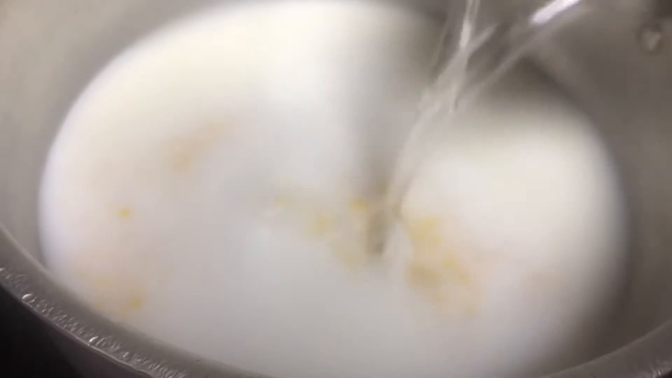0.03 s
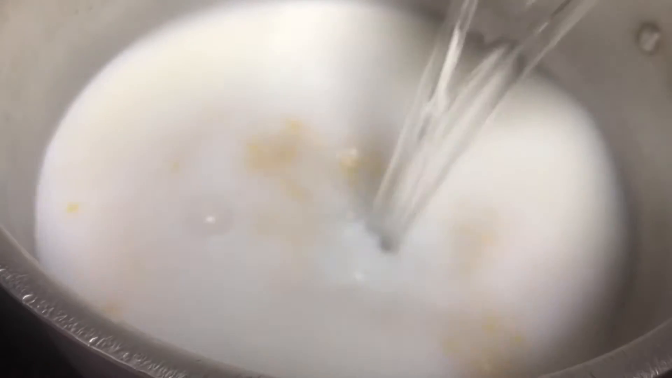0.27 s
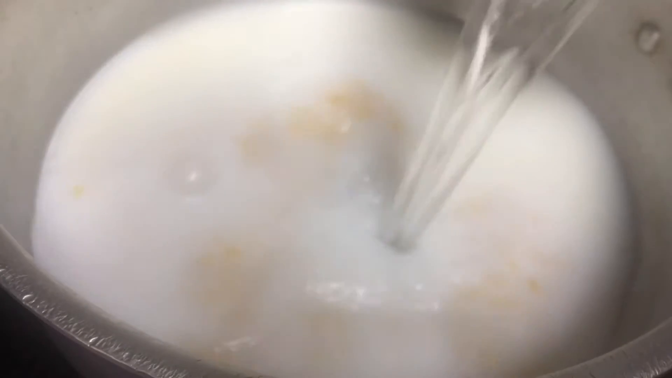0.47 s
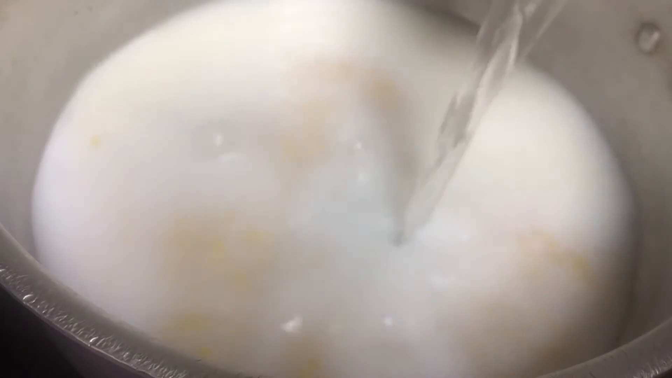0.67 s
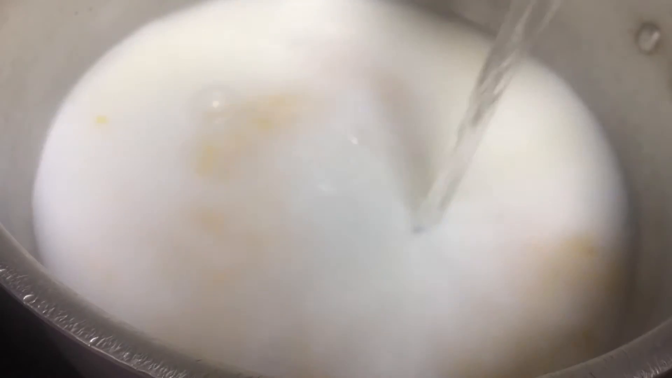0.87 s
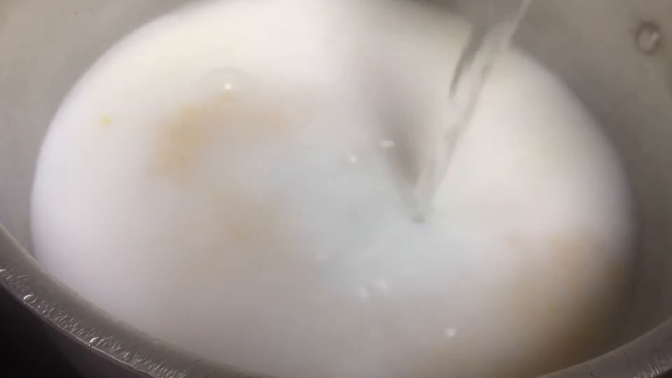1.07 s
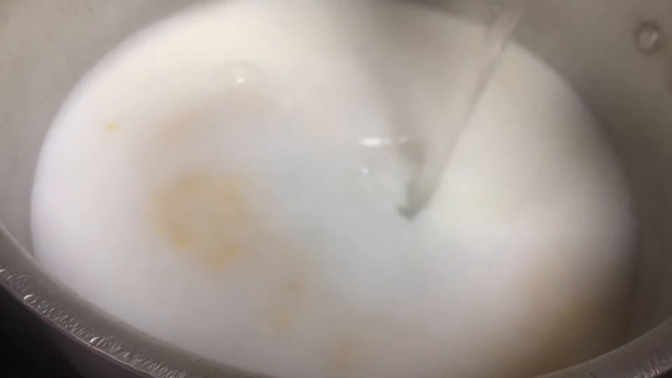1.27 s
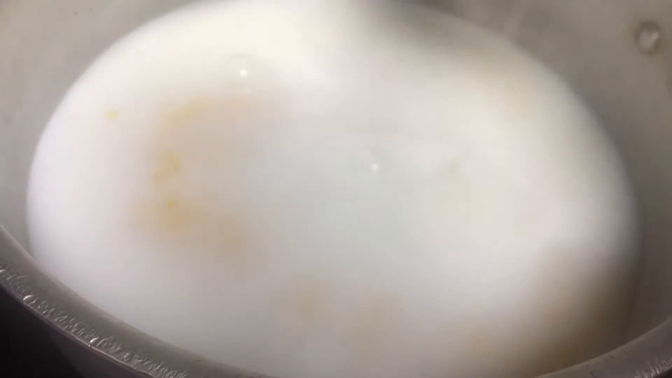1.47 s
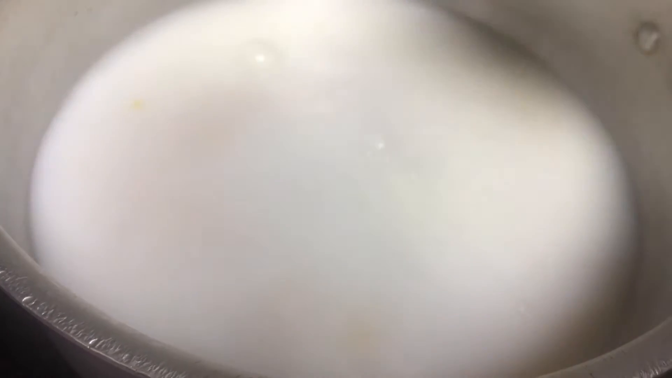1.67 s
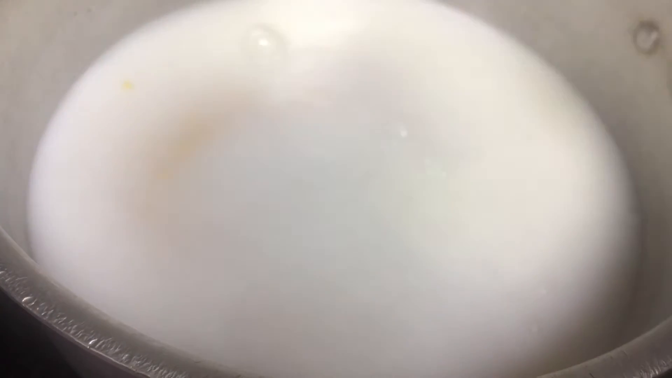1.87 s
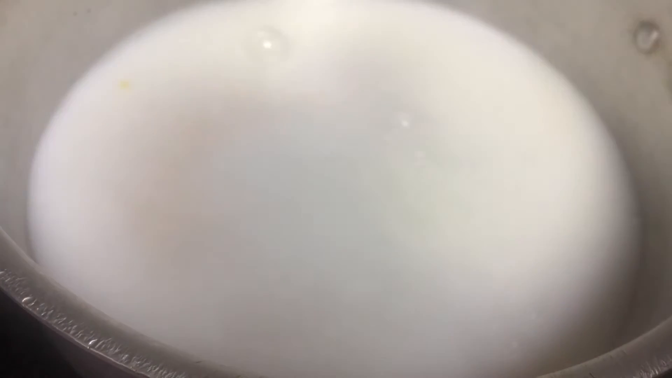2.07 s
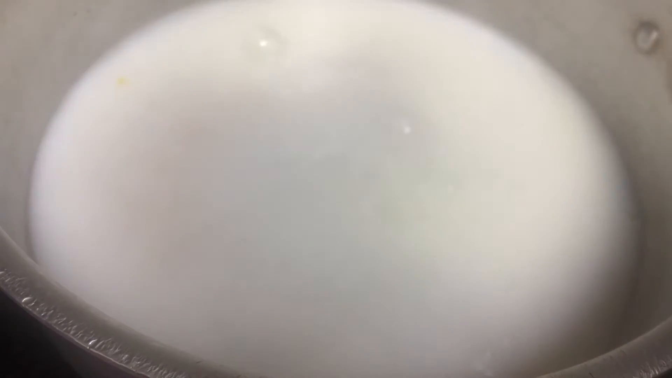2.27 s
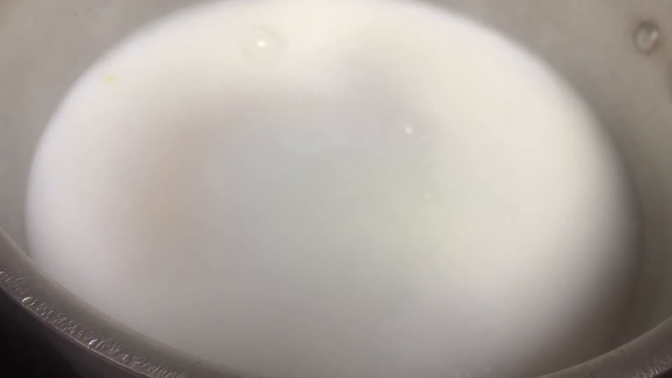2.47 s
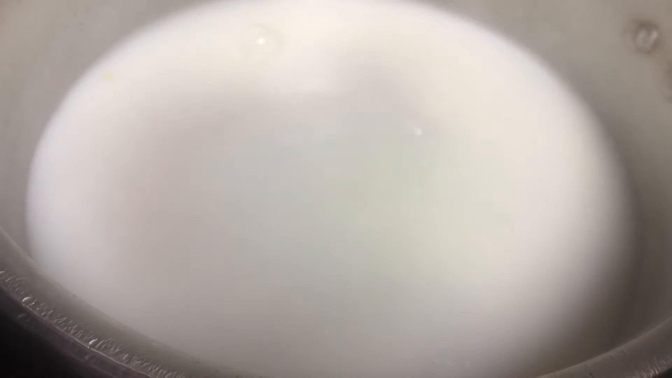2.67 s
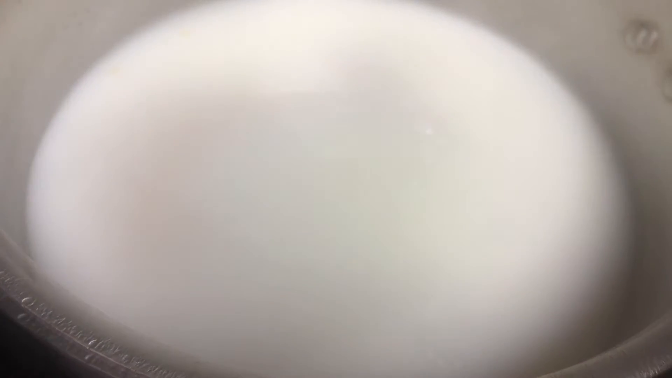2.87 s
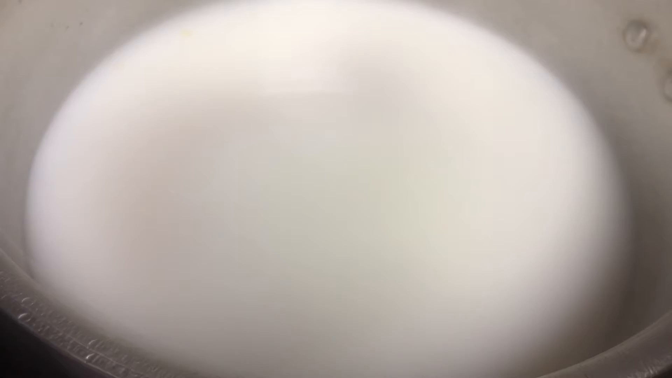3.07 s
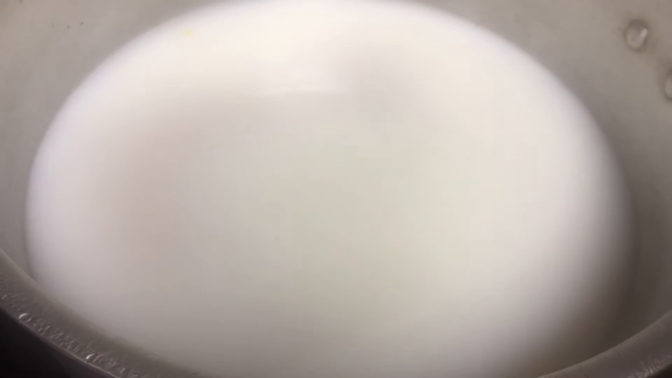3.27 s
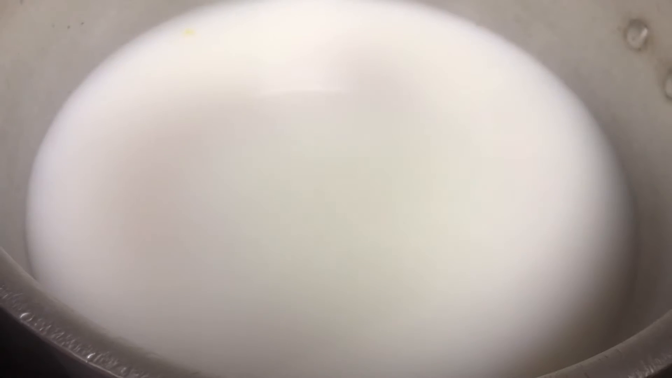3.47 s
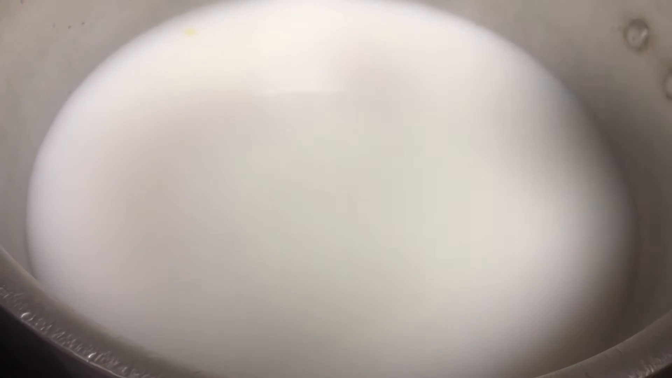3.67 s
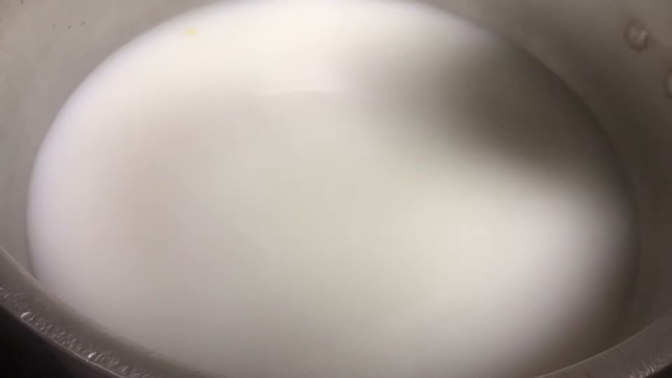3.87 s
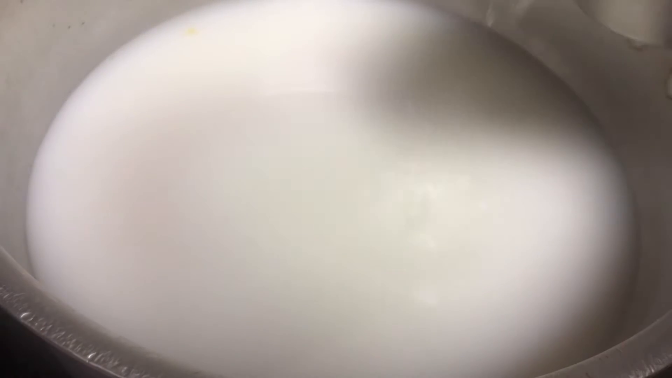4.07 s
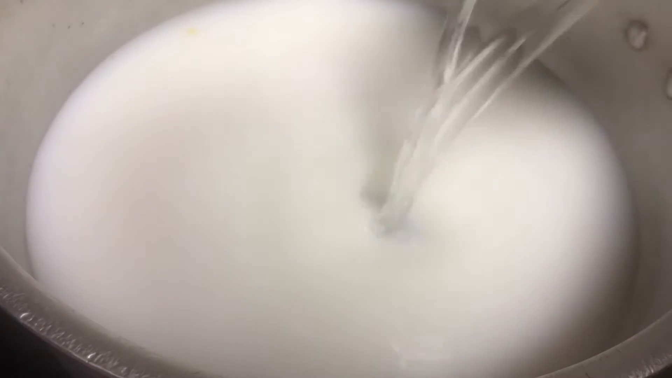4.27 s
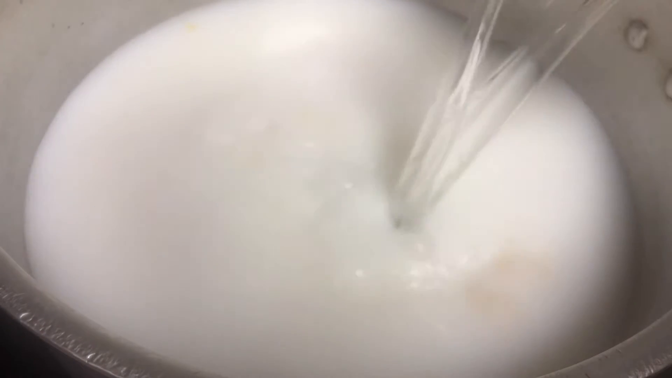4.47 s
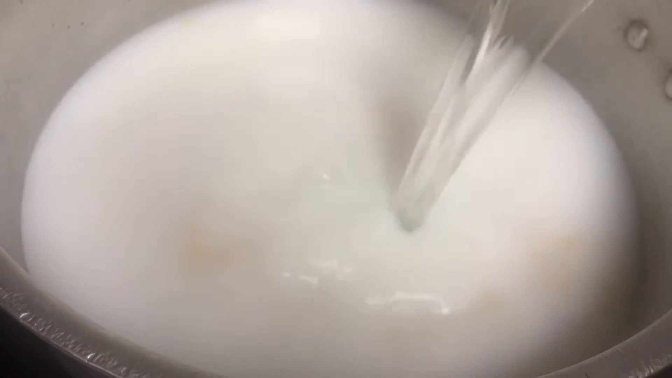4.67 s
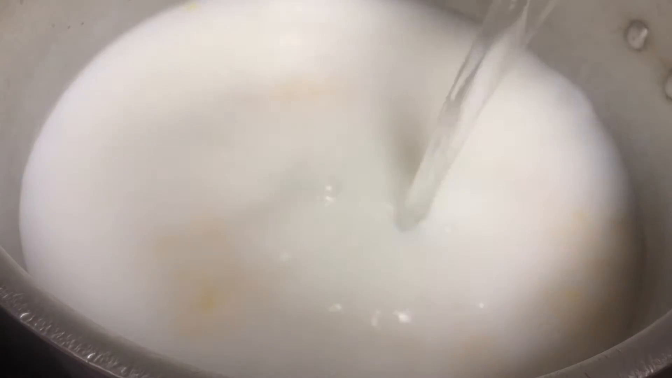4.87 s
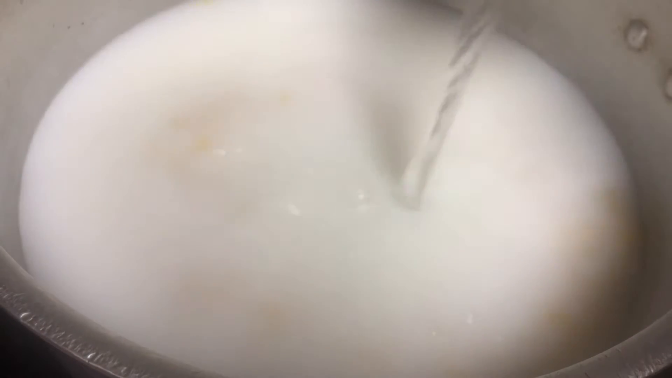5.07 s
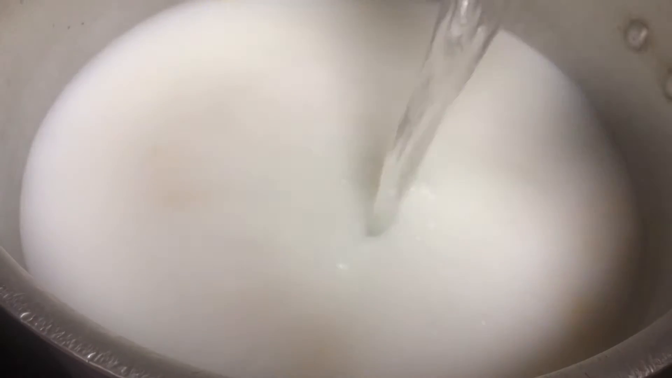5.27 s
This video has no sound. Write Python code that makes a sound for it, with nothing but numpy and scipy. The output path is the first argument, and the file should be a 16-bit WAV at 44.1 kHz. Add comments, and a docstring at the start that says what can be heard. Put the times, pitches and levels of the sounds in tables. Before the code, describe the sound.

A close microphone hears water hitting milky liquid in a steel pot for about a second and a half, bubbling and plinking. Then quiet: hollow metallic cup rubs, a short ringing scrape on the counter, fading fine fizz and a swelling motor hum. After a brief dull bump, a second pour bursts in louder, slaps and glugs, and continues to the end. The room tail is short.

```python
"""Two pours in a kitchen

Water falls from a cup into a steel pot of milky liquid, twice, while the kitchen hums.
The stream is many ringing bubbles plus noise; loud bubbles are gliding tones, slaps are puffs of noise.
The pot adds its resonances to the water. Froth ticks and hisses, and the steel cup is rubbed
and slid along the counter: dense clicks set it ringing. One brief rustle comes with a low thud."""
import sys
import numpy as np
from scipy import signal
from scipy.io import wavfile

SR = 44100
rng = np.random.default_rng(int(sys.argv[2]) if len(sys.argv) > 2 else 0)


def bounce(signal):
    """Save signal as a 16-bit WAV file at the path given by the first command-line argument."""
    frames = np.transpose(np.atleast_2d(signal))
    limited = np.clip(frames, -1, 1)
    pcm = np.round(limited * 32767).astype(np.int16)
    wavfile.write(sys.argv[1], SR, pcm)


N = 234476   # length in samples


def amp(db):
    """Turn decibels into a gain."""
    return 10 ** (np.asarray(db) / 20)


def unit(x):
    """Scale a sound to an average (rms) level of 1."""
    return x / np.sqrt(np.mean(x ** 2) + 1e-20)


def in_time(rows):
    """Draw a curve through the rows, sample by sample; outside its span it is at -150 dB."""
    s, *columns = np.transpose(rows)
    t = np.arange(N) / SR
    return [np.interp(t, s, column, left=-150, right=-150) for column in columns]


def strokes(rows, attack_s, release_s):
    """Gain of events that fade in, hold and die away (release = time to fall by a factor e)."""
    t = np.arange(N) / SR
    gain = 0
    for start_s, length_s, level_db in rows:
        fade_in = np.clip((t - start_s) / attack_s, 0, 1)
        fade_out = np.exp(-np.maximum(t - start_s - length_s, 0) / release_s)
        gain = gain + amp(level_db) * fade_in * fade_out
    return gain


def drift(rate):
    """Slow random wandering with a spread of 1; a higher rate (Hz) wanders faster."""
    r = np.exp(-80 * np.pi * rate / SR)   # smoothing for one step of 40 samples
    slow = signal.lfilter([1], [1, -2 * r, r * r], rng.standard_normal(N // 40 + 2002))[2000:]
    return np.interp(np.arange(N) / 40, np.arange(len(slow)), unit(slow))


def band(x, low_hz, high_hz):
    """Keep only the sound between two pitches."""
    return signal.sosfilt(signal.butter(2, [low_hz, high_hz], "band", fs=SR, output="sos"), x)


def resonate(x, hz, width_hz):
    """One resonance with gain 1 at its peak; a narrower one rings longer."""
    r = np.exp(-np.pi * max(width_hz, 1) / SR)
    feed = np.array([1, 0, -1]) * (1 - r * r) / 2
    return signal.lfilter(feed, [1, -2 * r * np.cos(2 * np.pi * hz / SR), r * r], x + 1e-18)


def resonate_twice(x, hz, width_hz):
    """The same resonance twice in a row: the ring swells before it dies."""
    return resonate(resonate(x, hz, width_hz), hz, width_hz)


def body(x, modes):
    """All resonances of an object side by side, with alternating signs."""
    return sum(amp(db) * (-1) ** k * resonate(x, hz, width) for k, (hz, width, db) in enumerate(modes))


def grains(per_s, spread_db):
    """Random clicks of uneven size and either sign."""
    sizes = amp(spread_db * np.minimum(rng.exponential(1, N), 5)) * rng.choice([-1, 1], N)
    return sizes * (rng.random(N) < per_s / SR)


def swarm(per_s, low_hz, high_hz, width, tilt_db, spread_db, clump_db):
    """Bubbles born in clumps, each ringing at one of 28 pitches (width as a share of it); rms 1."""
    born = grains(per_s * amp(clump_db * drift(25)), spread_db)
    dealt = rng.integers(0, 28, N)   # which pitch each bubble gets
    total = 0
    for k, hz in enumerate(np.geomspace(low_hz, high_hz, 28)):
        ring = resonate_twice(born * (dealt == k), hz, width * hz)
        total = total + amp(tilt_db * np.log2(hz / low_hz)) * ring   # tilt is dB per octave
    return unit(total)


# how the steady kitchen noise is spread over pitch: pitch_hz, relative level_db (per Hz)
AIR_COLOUR = [(15, -27), (25, -8), (111, -2.5), (149, -22), (206, -1.5), (317, -9), (384, -18.5),
              (476, -13.5), (659, -20), (962, -15), (1130, -21), (1330, -20.5), (2760, -32.5), (14800, -51),
              (16000, -59)]
# how loud that noise is over time: time_s, level_db
AIR_LEVEL = [(0, -56), (1.25, -55), (2.75, -57.5), (3.35, -54), (4.25, -53), (5.32, -54)]
# narrow appliance hums: pitch_hz, width_hz (of each of two passes), level_db
APPLIANCE_HUMS = [(56.9, 3, -69), (101, 1.9, -87), (212.6, 16, -64), (238.8, 7.5, -64.5), (7870, 130, -90),
                  (15200, 60, -93)]
# a motor hum that swells: time_s, level_db
MOTOR_LEVEL = [(0.0, -61.5), (0.92, -74), (2.44, -67), (3.03, -59), (3.82, -68), (4.25, -55.5),
               (5.32, -59.5)]
MOTOR_HZ = 121.3   # its pitch wanders around this


def background():
    """Kitchen air is noise in slightly flickering third-octave bands; appliances add narrow hums."""
    edges = 22 * 2 ** np.arange(0, 9.7, 1 / 3)
    white = rng.standard_normal((2, N))   # neighbouring bands take turns
    hz, db = np.transpose(AIR_COLOUR)
    air = 0
    for k, (low, high) in enumerate(zip(edges, edges[1:])):
        colour_db = np.interp(np.log(low * high) / 2, np.log(hz), db)
        air = air + amp(colour_db + 0.23 * drift(1.6)) * band(white[k % 2], low, high)
    hums = sum(amp(db) * unit(resonate_twice(white[0], hz, width)) for hz, width, db in APPLIANCE_HUMS)
    motor_phase = 2 * np.pi * np.cumsum(MOTOR_HZ + 0.99 * drift(5.1)) / SR
    motor = amp(in_time(MOTOR_LEVEL)[0]) * np.sqrt(2) * np.sin(motor_phase)
    return amp(in_time(AIR_LEVEL)[0]) * unit(air) + hums + motor


ROOM_T60_S = 0.13   # time for the tail to fall by 60 dB


def kitchen(x):
    """The room answers with a short dense tail that starts after 3 ms."""
    t = np.arange(int(.4 * SR)) / SR
    tail = rng.standard_normal(len(t)) * amp(-60 * t / ROOM_T60_S) * (t > .003)
    tail = signal.lfilter([.5], [1, -.5], tail)   # softer treble
    return signal.fftconvolve(x, tail / np.sqrt(np.sum(tail ** 2)))[:N]


# one brief rustle: start_s, length_s, level_db (of its bright part)
RUSTLE_EVENT = (3.775, 0.016, -54.5)
THUD_OVER_DB = 7.5   # thud above the bright part
RUSTLE_RELEASE_S, THUD_RELEASE_S = 0.04, 0.047


def rustle():
    """The same dense clicks make a bright rustle and, in a low band, a thud."""
    noise = grains(1500, 2.4)
    bright = strokes([RUSTLE_EVENT], 0.012, RUSTLE_RELEASE_S) * unit(band(noise, 1500, 6500))
    thud = strokes([RUSTLE_EVENT], 0.022, THUD_RELEASE_S) * unit(band(noise, 223, 410))
    return bright + amp(THUD_OVER_DB) * thud


# fingers rub the empty cup: start_s, length_s, level_db
RUBS = [(1.47, 0.014, -55.5), (1.58, 0.1, -58), (1.68, 0.05, -51.5), (1.81, .03, -58.5), (1.87, 0.039, -56),
        (1.97, .03, -63), (2.08, 0.053, -61)]
# resonances of the cup in the hand: pitch_hz, width_hz, relative level_db
HELD_MODES = [(1023, 74, 6), (1053, 109, 1.5), (2727, 52, -14.5), (4070, 27, -19), (4380, 46, -29),
              (5840, 30, -16)]
# a nudge, then the slide along the counter: start_s, length_s, level_db
SLIDES = [(2.43, .03, -63.5), (2.48, 0.079, -54)]
# resonances of the cup on the counter: pitch_hz, width_hz, relative level_db
SLIDE_MODES = [(950, 57, 1.5), (1270, 230, 2.5), (1994, 54, -2.5), (2810, 100, 4.5), (2950, 35, 4),
               (3980, 35, 2), (5220, 40, -3), (5900, 88, -16), (6840, 8.6, -5), (7000, 55, -33)]
RUB_ATTACK_S, RUB_RELEASE_S = 0.011, 0.018
SLIDE_ATTACK_S, SLIDE_RELEASE_S = 0.015, 0.095


def cup():
    """Dense friction clicks set the steel cup ringing, in the hand and on the counter."""
    held = unit(body(grains(2300 * amp(2 * drift(35)), 2.8), HELD_MODES))
    scrape = grains(2500, 2.1)
    slide = unit(body(scrape, SLIDE_MODES)) + amp(-6.5) * unit(band(scrape, 640, 3800))
    rubbing = strokes(RUBS, RUB_ATTACK_S, RUB_RELEASE_S) * held
    return rubbing + strokes(SLIDES, SLIDE_ATTACK_S, SLIDE_RELEASE_S) * slide


# patches of froth collapse: start_s, length_s, level_db (of the hiss)
COLLAPSES = [(1.57, .16, -81), (2.06, 0.044, -75), (3.065, 0.036, -70.5)]
# the froth left by the first pour thins out
FROTH_START_S, FROTH_DB, FROTH_FADE_DB_PER_S = 1.416, -64.5, 7


def froth():
    """Tiny bubbles on the surface burst as faint bright ticks over a patchy fine hiss."""
    ticks = swarm(900, 4800, 15000, width=0.18, tilt_db=1.5, spread_db=3.8, clump_db=5)
    edges = np.geomspace(4000, 17000, 9)
    white = rng.standard_normal((2, N))
    shared_db = 1.2 * drift(20)   # all bands swell together, and each on its own
    hiss = 0
    for k, (low, high) in enumerate(zip(edges, edges[1:])):
        hiss = hiss + amp(2 * drift(22) + shared_db) * band(white[k % 2], low, high)
    age = np.arange(N) / SR - FROTH_START_S
    thinning = amp(FROTH_DB - FROTH_FADE_DB_PER_S * age) * (age > 0)
    level = thinning + strokes(COLLAPSES, 0.02, 0.012)
    return level * (unit(hiss) + amp(-7) * ticks)


# the loudest drops slapping the surface and froth pops: start_s, relative level_db, treble pitch_hz
SLAP_EVENTS = [(0.033, -30, 5630), (0.078, -25.5, 5050), (0.1807, -35.5, 5900), (0.3082, -35, 5900),
               (0.37, -35.5, 8160), (0.403, -33.5, 6950), (0.4444, -34.5, 6500), (0.478, -41, 14200),
               (0.5402, -42, 9850), (0.603, -33, 6000), (0.6433, -30.5, 7540), (0.837, -38, 6080),
               (0.9128, -27.5, 6700), (1.078, -33.5, 5900), (1.1635, -36, 9300), (1.1915, -27.5, 9200),
               (1.202, -20.5, 6460), (1.2135, -35, 11400), (1.2424, -33, 9300), (1.276, -29, 6700),
               (1.3463, -28, 6300), (1.36, -24, 7700), (1.3817, -23, 6900), (1.3822, -28, 11600),
               (1.395, -36, 11000), (1.41, -40, 11500), (1.455, -44, 5600), (1.706, -48, 8700),
               (1.799, -50, 6800), (1.948, -54, 5700), (2.1, -51, 5900), (2.3012, -51, 6380),
               (2.7317, -51, 7260), (3.3433, -57, 9390), (3.93, -52, 13000), (4.0058, -55, 9000),
               (4.0443, -52, 11500), (4.096, -16, 5100), (4.1517, -19.5, 5570), (4.168, -23, 5500),
               (4.1965, -16.5, 9200), (4.2497, -37, 11400), (4.4006, -37, 6860), (4.415, -28.5, 6670),
               (4.4636, -32, 6840), (4.4992, -42, 8420), (4.6156, -28, 9500), (4.7017, -28, 6200),
               (4.713, -29.5, 14200), (4.738, -32, 6740), (4.7504, -30, 6530), (4.803, -32, 5900),
               (4.8682, -38.5, 7850), (4.915, -33, 5510), (5.082, -32, 7400), (5.202, -41, 6600),
               (5.228, -30, 5230), (5.274, -39, 5600), (5.2944, -24.5, 9000)]
# the duller body of a slap at the mean level; it grows more slowly than the treble
SLAP_BODY_DB, SLAP_BODY_FOLLOWS, SLAP_MEAN_DB = -40, 0.6, -27


def slaps():
    """Each slap is a puff of noise, dead in milliseconds: treble ring, duller body, thin crack on top."""
    out = np.zeros(N + SR)
    t = np.arange(1000) / SR
    for start_s, db, hz in SLAP_EVENTS:
        fade = np.exp(-t / 0.0011) + 0.28 * np.exp(-t / 0.011)   # crack and wet tail
        puff = rng.standard_normal(1000) * fade
        treble = resonate_twice(puff, hz, 0.43 * hz) + amp(-15.5) * band(puff, 9000, 19845)
        body_db = SLAP_BODY_DB + SLAP_BODY_FOLLOWS * (db - SLAP_MEAN_DB)
        at = int(start_s * SR)
        out[at:at + 1000] += amp(db + 3.5) * treble + amp(body_db) * band(puff, 1800, 6200)
    return out[:N]


# the loudest single bubbles: start_s, pitch_hz, level_db (peak before the flutter)
LOUD_BUBBLES = [(0.0092, 2810, -24), (0.016, 1210, -45), (0.045, 5200, -30), (0.067, 2180, -34),
                (0.0733, 2630, -26), (0.079, 5160, -32.5), (0.3027, 3480, -35), (0.3556, 4130, -39),
                (0.376, 3300, -35), (0.4083, 4230, -34.5), (0.644, 1800, -35.5), (0.6485, 1220, -36),
                (0.487, 3440, -41), (0.55, 2880, -42.5), (0.6852, 2880, -34), (0.6856, 1270, -38),
                (0.713, 1270, -41), (0.735, 1210, -39), (0.8507, 3420, -38.5), (0.9156, 1650, -35.5),
                (0.9164, 5600, -37.5), (1.076, 2110, -34.5), (1.158, 1160, -45), (1.191, 3860, -30),
                (1.2018, 3340, -31), (1.2134, 6950, -38), (1.2146, 720, -33), (1.2144, 1200, -32.5),
                (1.2185, 3350, -35.5), (1.264, 2020, -33.5), (1.275, 1620, -36), (1.278, 790, -36),
                (1.3178, 780, -37.5), (1.3464, 3610, -32.5), (1.3491, 756, -29), (1.3488, 1244, -28),
                (1.3606, 3380, -29), (1.3655, 696, -33), (1.3838, 746, -33.5), (1.3832, 7000, -23),
                (1.385, 4740, -33.5), (1.3997, 1130, -29.5), (1.504, 3860, -44), (4.0962, 3840, -32),
                (4.0972, 4760, -22), (4.113, 2950, -32.5), (4.15, 3500, -30), (4.154, 6130, -24.5),
                (4.1681, 2180, -31), (4.172, 3540, -26), (4.174, 1650, -31.5), (4.1901, 737, -28),
                (4.19, 3240, -36), (4.198, 5150, -23), (4.207, 4200, -34), (4.2085, 1210, -34),
                (4.2114, 603, -31.5), (4.216, 2220, -29.5), (4.2312, 604, -39), (4.242, 2930, -37),
                (4.2813, 4600, -38.5), (4.2833, 1110, -41), (4.3526, 3230, -32.5), (4.397, 4160, -40),
                (4.416, 6530, -44), (4.461, 4820, -39), (4.4678, 3230, -35), (4.485, 2700, -45),
                (4.53, 2840, -43), (4.554, 2750, -43), (4.6149, 4180, -40), (4.7005, 2880, -39),
                (4.711, 6170, -35), (4.74, 2860, -38), (4.751, 6860, -38), (4.7546, 1140, -38),
                (4.7966, 703, -38), (4.816, 1136, -35.5), (4.817, 2650, -36), (4.824, 5450, -32),
                (4.9194, 5400, -35.5), (4.939, 5840, -38.5), (4.994, 1140, -37), (5.049, 2600, -37.5),
                (5.0567, 716, -39.5), (5.0944, 4230, -37), (5.12, 4150, -37.5), (5.2057, 1150, -42),
                (5.2387, 1960, -35.5), (5.2638, 4230, -32), (5.2661, 2210, -36), (5.2876, 5240, -34),
                (5.2934, 1156, -34), (5.305, 3930, -35.5)]
BUBBLE_MS_AT_1KHZ, BUBBLE_SHORTENS = 5, 0.45   # length falls with this power of pitch
BUBBLE_GLIDE, BUBBLE_GLIDE_SPREAD = 0.079, 0.058   # mean pitch rise over one length, as a share


def bubbles():
    """A trapped bubble swells in, dies away and glides in pitch; the churning water makes it flutter."""
    out = np.zeros(N + SR)
    for start_s, hz, db in LOUD_BUBBLES:
        length_s = BUBBLE_MS_AT_1KHZ / 1000 * (hz / 1000) ** -BUBBLE_SHORTENS   # small ones die sooner
        rise = BUBBLE_GLIDE + BUBBLE_GLIDE_SPREAD * rng.standard_normal()
        t = np.arange(int(4 * length_s * SR)) / SR
        u = 2.25 * t / length_s   # the swell peaks near u = 1
        swell = u * np.exp(1 - u - 0.012 * u * u)
        glided_t = t + rise * (t * t / (2 * length_s) - t / 2)
        at = int(start_s * SR)
        out[at:at + len(t)] += amp(db) * swell * np.sin(2 * np.pi * hz * glided_t)
    return out[:N] * (1 + 0.23 * drift(80))


# strength of the stream, one list a pour: time_s, relative level_db
POURS = [
    [(0.0, -43), (0.08, -45.5), (0.2, -51), (0.34, -50), (0.64, -52.5), (0.88, -53.5), (1.07, -51),
     (1.25, -46), (1.34, -55.5), (1.4, -48.5), (1.43, -71), (1.5, -60)],
    [(4.08, -71), (4.162, -51), (4.19, -40), (4.29, -55), (4.42, -57), (4.48, -55.5), (4.6, -53.5),
     (4.68, -51), (4.82, -48.5), (4.88, -54.5), (5.07, -52.5), (5.2, -53), (5.317, -48.5)],
]
# glugs, when the stream breaks up and traps large bubbles: start_s, length_s, relative level_db
GLUG_EVENTS = [(0.0, 0.017, -50.5), (0.375, .2, -60), (0.65, 0.083, -51), (0.85, 0.014, -73),
               (0.91, 0.038, -60), (1.04, 0.17, -49.5), (1.21, 0.15, -47.5), (1.345, 0.035, -40),
               (4.18, 0.022, -51.5), (4.27, 0.033, -49.5), (4.69, 0.17, -47.5), (4.98, 0.099, -46),
               (5.2, 0.073, -42.5), (5.27, .06, -42.5)]
GLUG_ATTACK_S, GLUG_RELEASE_S = 0.004, 0.034
# spray under the mean flow level; share of the flow's swing it follows
SPRAY_BELOW_DB, SPRAY_FOLLOWS, FLOW_MEAN_DB = -9.5, 1, -59


def stream():
    """Large bubbles gurgle, middling ones plink, small ones fizz; fine droplets sparkle over hiss and mist."""
    flow_db = np.max([in_time(pour)[0] for pour in POURS], axis=0)
    spray_db = FLOW_MEAN_DB + SPRAY_BELOW_DB + SPRAY_FOLLOWS * (flow_db - FLOW_MEAN_DB)

    gurgle = swarm(700, 687, 2280, width=0.12, tilt_db=1.5, spread_db=2.5, clump_db=3)
    plinks = swarm(500, 1700, 7000, width=0.045, tilt_db=-1.5, spread_db=3.5, clump_db=3)
    fizz = swarm(2600, 2400, 7500, width=0.08, tilt_db=-3, spread_db=3.4, clump_db=3)
    sparkle = swarm(3500, 6520, 15470, width=0.04, tilt_db=-6, spread_db=4.8, clump_db=5)
    wash = unit(band(rng.standard_normal(N), 2320, 5160)) * amp(7.5 * drift(43))   # splashing
    hiss = unit(band(rng.standard_normal(N), 5500, 10000))
    mist = unit(band(rng.standard_normal(N), 7400, 16000)) * amp(2.5 * drift(32))

    glugs = strokes(GLUG_EVENTS, GLUG_ATTACK_S, GLUG_RELEASE_S)
    glugs = glugs + amp(flow_db - 11)   # a little gurgle also between glugs
    small = amp(-2.5) * fizz + amp(-2.5) * plinks + amp(-11) * wash
    spray = sparkle + amp(-0.5) * hiss + amp(-9) * mist
    return amp(-8.5) * glugs * gurgle + amp(flow_db - 1.5) * small + amp(spray_db) * spray


# air and wall resonances of the pot: pitch_hz, width_hz, relative level_db
POT_MODES = [(770, 30, 2.5), (1070, 41, 5.5), (1200, 89, 4), (1650, 70, -0.5), (1920, 39, -9.5),
             (2790, 140, -2), (3396, 170, -10), (4230, 65, 1.5), (5220, 460, -19)]
ROOM_DB = -14   # room tail against the direct sound


def scene():
    """The water sounds directly and through the pot; all near sounds fill the room."""
    water = stream() + slaps()
    in_pot = amp(8.5) * body(water, POT_MODES)
    near = water + in_pot + bubbles() + froth() + cup() + rustle()
    return (near + amp(ROOM_DB) * kitchen(near) + background())[None]


CUTOFF_HZ = 16400   # from here up, at least 60 dB down


def record(dry):
    """The microphone drops the deepest bass; the top is cut."""
    dry = signal.sosfilt(signal.butter(3, 36, "high", fs=SR, output="sos"), dry)
    return signal.sosfilt(signal.cheby2(14, 60, CUTOFF_HZ, fs=SR, output="sos"), dry)


dry = scene()
out = record(dry)
bounce(out)
```